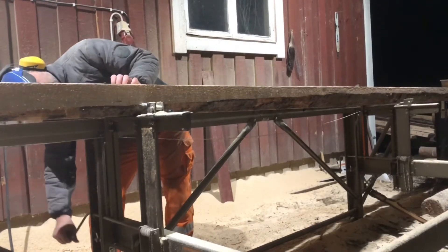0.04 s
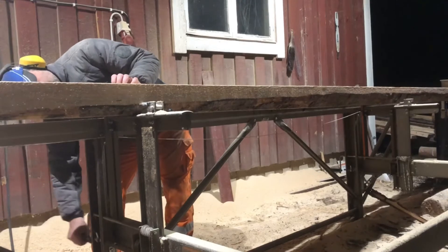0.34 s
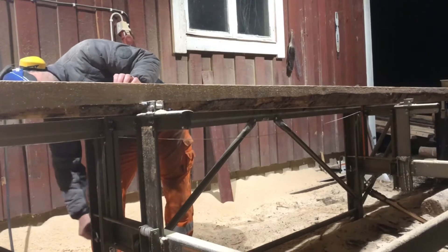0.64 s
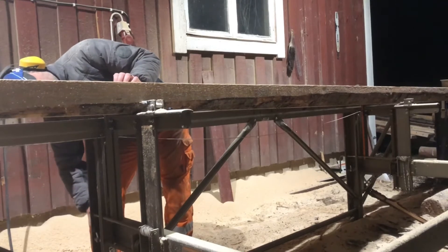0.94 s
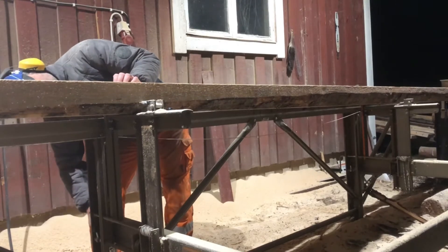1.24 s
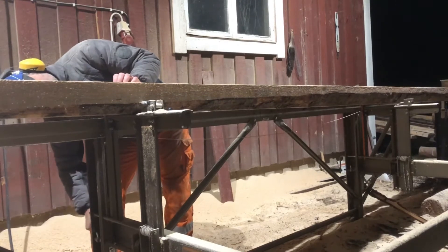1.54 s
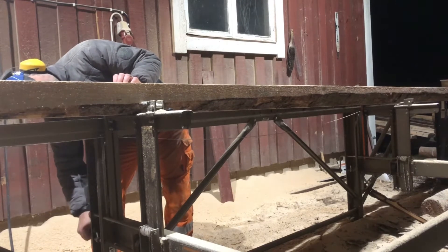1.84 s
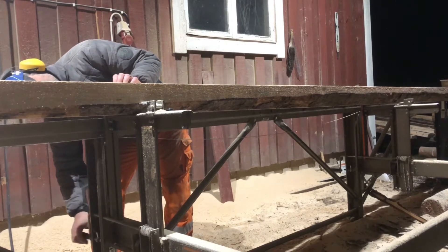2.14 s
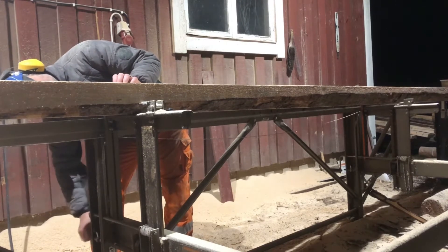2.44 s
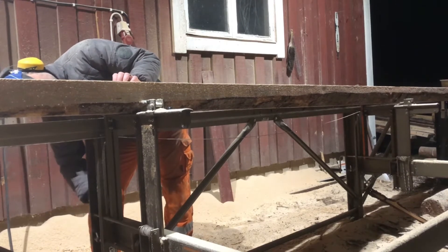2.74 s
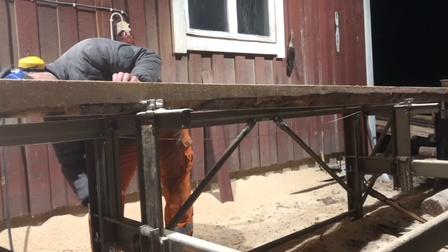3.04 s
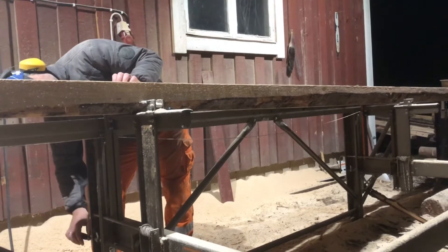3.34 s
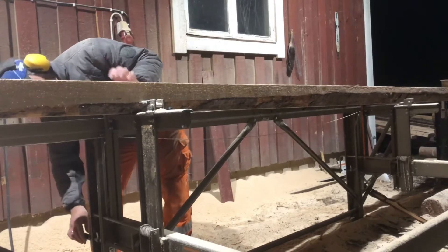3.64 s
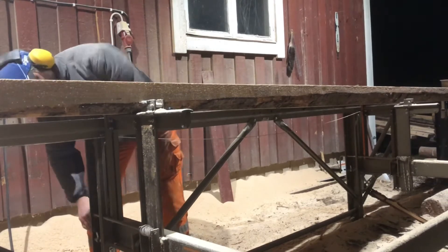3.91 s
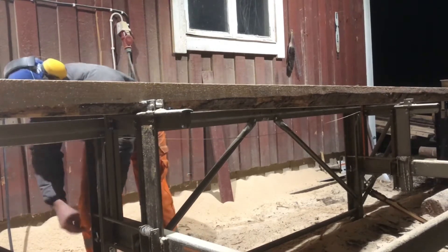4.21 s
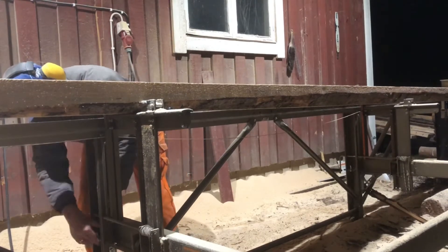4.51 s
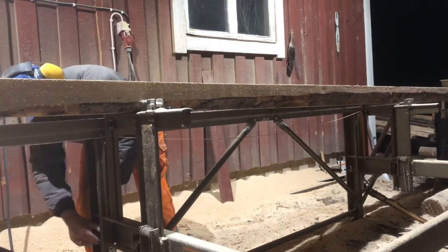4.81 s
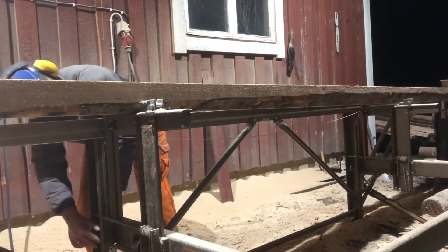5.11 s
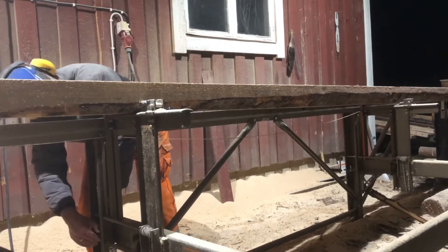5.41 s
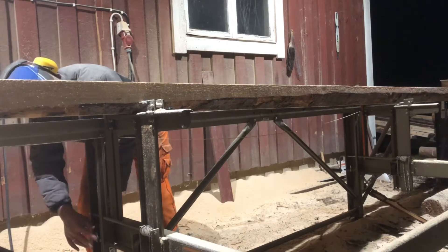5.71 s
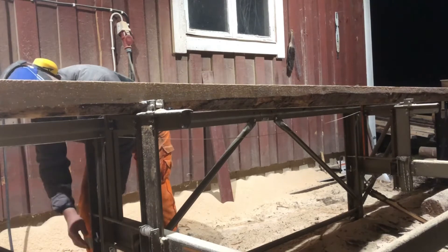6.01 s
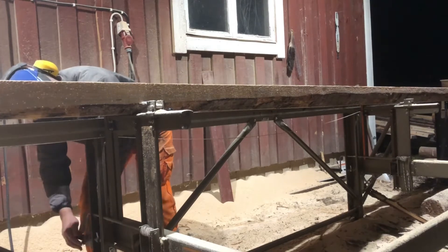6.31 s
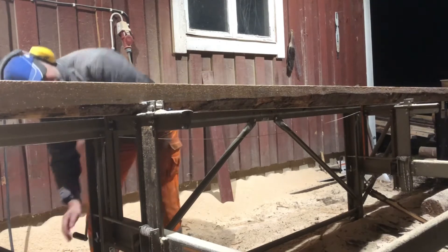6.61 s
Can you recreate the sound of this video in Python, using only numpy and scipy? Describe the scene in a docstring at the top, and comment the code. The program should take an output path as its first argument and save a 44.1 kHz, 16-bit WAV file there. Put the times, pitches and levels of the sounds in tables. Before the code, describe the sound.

Three hard steel blows clack on a log clamp right at the start, at 0.3 and at 0.7 seconds, each ringing for under half a second through the frame of a small, idle sawmill. A lull follows, with a barely audible scrape at 1.5 seconds and soft knocks and sliding from 2.3. A fourth bright blow lands at 2.7 seconds, followed near 3 by a knock and a short juddering scrape of the clamp bar. A jacket rustles faintly from about 3.4. Between 4 and 5.3 seconds loose steel parts knock and clink irregularly, much quieter than the blows. A duller fifth blow rings at 5.4 seconds. At 6 comes a brief scrape with a thin, very high squeak, then light knocks and cloth rustle until about 6.7. Shed walls add a short echo, and a faint outdoor hush lies underneath throughout.

```python
"""Hard steel blows clack on a log clamp and ring through the frame of a small, idle sawmill.
Between them, as a man sets the clamp, loose parts knock and clink, its bar scrapes in quick slips
and squeaks, and his jacket rustles as he shifts. The walls of a wooden shed answer the steel,
over a faint outdoor hush."""
import sys
import numpy as np
from scipy import signal
from scipy.fft import rfft, irfft, next_fast_len
from scipy.io import wavfile
from scipy.ndimage import uniform_filter1d, map_coordinates

SR = 44100
rng = np.random.default_rng(int(sys.argv[2]) if len(sys.argv) > 2 else 0)


def put_to_file(sound):
    """Save the sound as 16-bit audio at rate SR, in the file named by the first command-line argument."""
    columns = np.atleast_2d(sound).T  # one column per channel
    safe = np.clip(columns, -1, 1)
    whole_steps = np.round(safe * 32767)
    wavfile.write(sys.argv[1], SR, whole_steps.astype(np.int16))


N = 297675
RING_SAMPLES = SR * 3 // 4

# Blows: (time [s], gain [dB], low-pass [Hz], frame gain [dB], spot [0 head, 1 side])
BLOW_HITS = [(-0.025, 1, 7000, 1.5, 0.094), (0.3205, 2.5, 12000, -.5, 0.027), (0.724, 0.5, 9000, 1.5, 0),
             (2.6637, 1, 13830, 1.5, 0), (5.4206, -1, 2410, 0, 1)]
# Clamp modes: (frequency [Hz], level [dB], t60 [s])
CLAMP_MODES = [(637.3, -14, .03), (980, -9.5, 0.032), (1223, -8.5, 0.032), (1589, -5, .025),
               (1973, -8, 0.073), (2480, -6.5, .02), (2910, 1.5, .02), (3606, -3.5, 0.032),
               (4240, -9, 0.028), (4910, -9.5, 0.012), (5400, -5.5, .022), (8020, -15.5, 0.017),
               (10060, -12.5, 0.023), (10650, -22, .016)]
# Frame modes: (frequency [Hz], level hit on head [dB], level hit on side [dB], t60 [s])
FRAME_MODES = [(243, -11, -21, .38), (308.7, -11, -6, .28), (381.2, -16.5, -10, 0.44),
               (570.4, -10.5, -18, 0.4), (658.3, -8, -12, 0.51), (688.6, -0.5, -13.5, 0.33),
               (713.5, -2.5, -11, 0.38), (758, -5.5, -12.5, 0.28), (860, -11.5, -3, 0.17),
               (1038, -9.5, -3.5, 0.29), (1068, -11.5, -7.5, 0.42), (1179, -7, -7, 0.22),
               (1348, -9, -13.5, 0.37), (1544, -5.5, -5.5, 0.25), (1714, 2, -1, .22),
               (1773, -6.5, 3.5, .22), (1850, -4, -6, 0.11), (1935, -4, -5.5, 0.3), (2140, -11.5, 0, .24),
               (2330, -5, -6.5, 0.12), (2470, -2.5, -9.5, .24), (2602, -2.5, -1, 0.27),
               (2845, -5.5, -6.5, 0.27), (3030, -14.5, -2.5, 0.26), (3115, -6.5, -5.5, 0.17),
               (3373, -7, -15.5, 0.24), (3610, -6.5, -12, 0.16), (3770, -8.5, -7, 0.2),
               (4050, -9.5, -16, 0.18), (5410, -12, -10.5, 0.18)]
# Bare steel contact: (frequency [Hz], relative density [dB])
CRACK_SPECTRUM = [(40, -58.5), (300, -26), (1000, -6), (3000, 0), (5400, -1.5), (6500, -10.5), (11000, -12),
                  (13000, -21.5)]
# Diffuse frame clang: (frequency [Hz], relative density [dB])
CLANG_SPECTRUM = [(30, -50), (65, -19.5), (190, -18.5), (255, -15), (480, -10), (720, -2.5), (950, -9),
                  (1600, -4.5), (2650, -3.5), (3400, -8.5), (5400, -13.5), (7000, -17), (10200, -23.5),
                  (12000, -33.5), (16000, -35)]


def blows(clack_db=-7, crack_db=-15, crack_t60_s=0.048, ring_db=-25, clang_db=-19,
          attack_s=0.00022, build_s=0.0023, clack_highpass_hz=400, fresh_gain=0.23, scatter_db=1):
    """Steel on steel: the clamp clacks, the frame rings. Same parts, so the blows sound much alike."""
    out, t = np.zeros(N), np.arange(RING_SAMPLES) / SR
    clamp_hz, clamp_db, clamp_t60 = np.transpose(CLAMP_MODES)
    frame_hz, head_db, side_db, frame_t60 = np.transpose(FRAME_MODES)
    clamp = damped_modes(clamp_hz, clamp_t60)
    frame = damped_modes(frame_hz, frame_t60)
    head_clang = modal_noise(CLANG_SPECTRUM)
    highpass = signal.butter(2, clack_highpass_hz, "high", fs=SR)  # the clack carries little bass

    def struck(modes, db):
        return amp(db + scatter_db * rng.standard_normal(len(modes))) @ modes

    for start, db, lowpass_hz, frame_db, spot in BLOW_HITS:
        clack = amp(clack_db) * struck(clamp, clamp_db)
        clack += amp(crack_db) * modal_noise(CRACK_SPECTRUM) * 1000 ** (-t / crack_t60_s)
        clack = signal.lfilter(*highpass, clack * (1 - np.exp(-t / attack_s)))
        tones = struck(frame, head_db + spot * (side_db - head_db))
        diffuse = unit_rms((1 - spot) * head_clang + fresh_gain * modal_noise(CLANG_SPECTRUM))
        clang = amp(frame_db) * (amp(clang_db) * yard_decay(diffuse) + amp(ring_db) * tones)
        blow = clack + frame_spread(clang, build_s)
        lowpass = signal.butter(1, lowpass_hz, fs=SR)  # a softer contact lasts longer, loses treble
        add(out, start, amp(db) * signal.lfilter(*lowpass, blow))
    return out


# Clamp on frame: (time [s], body level [dB], low-pass [Hz], ring pitch [Hz], ring level [dB])
KNOCK_HITS = [(2.256, -52.5, 1310, 430, -59.5), (2.294, -56, 3000, 347, -53.5),
              (2.409, -56, 2500, 298, -56), (2.439, -55, 1200, 280, -52), (2.945, -37, 4960, 905, -42),
              (2.992, -44.5, 3000, 784, -48), (4.013, -43.5, 2200, 1060, -44.5),
              (4.078, -44, 2470, 1006, -45.5), (4.218, -53.5, 1790, 382, -47.5),
              (4.257, -50.5, 2800, 350, -52.5), (4.450, -34.5, 3550, 1030, -37.5),
              (4.471, -33.5, 1510, 295, -45), (4.528, -43.5, 1300, 219.4, -55),
              (4.702, -37, 1400, 372, -44), (5.037, -56.5, 1500, 800, -61),
              (5.252, -38.5, 2000, 577, -39.5), (5.263, -40.5, 900, 233, -35),
              (5.688, -55.5, 1792, 970, -55.5), (5.879, -50.5, 3000, 756, -54),
              (6.107, -49.5, 2600, 940, -52.5), (6.655, -57, 1300, 800, -62.5),
              (6.732, -63, 2500, 344, -47)]
# Knock body: (frequency [Hz], relative density [dB])
KNOCK_SPECTRUM = [(35, -41.5), (110, -15.5), (250, -6.5), (450, -6.5), (650, -2), (950, -2), (1350, -9),
                  (3300, -15), (6000, -26.5), (11000, -40), (16000, -48)]


def knocks(ring_width_ratio=0.22):
    """Loose parts meet the frame: softer contacts are duller, each spot has its own blurred pitch."""
    out = np.zeros(N)
    for start, db, lowpass_hz, ring_hz, ring_db in KNOCK_HITS:
        thud = filtered(modal_noise(KNOCK_SPECTRUM), lambda hz: (1 + (hz / lowpass_hz) ** 4) ** -0.5)
        body = amp(db) * unit_rms(thud) + amp(ring_db) * resonant_noise(ring_hz, ring_width_ratio)
        add(out, start, tap(body, contact_db=1.5, contact_t60_s=0.017, attack_s=0.00073))
    return out


# Small parts: (time [s], ring level [dB], ring pitch [Hz], ring width [ratio], tick level [dB])
CLINK_HITS = [(2.293, -64.5, 2800, .2, -76), (4.013, -42, 4680, 0.16, -45), (4.257, -51, 4700, .2, -55.5),
              (4.691, -53, 7700, 0.067, -46), (5.251, -43.5, 2850, 0.078, -55)]
# Clink contact: (frequency [Hz], relative density [dB])
TICK_SPECTRUM = [(100, -33), (1000, 0), (3300, 0), (6000, -1.5), (9000, -3), (11000, -16), (16000, -20)]


def clinks(play_lead_s=0.02, play_db=-51, play_hz=3021, play_width_ratio=0.32):
    """Small steel parts touch: a bright tick and one blurred ring."""
    out, bodies = np.zeros(N), []
    for start, ring_db, hz, width_ratio, tick_db in CLINK_HITS:
        ring = amp(ring_db) * resonant_noise(hz, width_ratio)
        bodies.append((start, ring + amp(tick_db) * modal_noise(TICK_SPECTRUM)))
    # the loose clamp takes up its play just before each blow on its head
    for start, *_, spot in BLOW_HITS:
        tick = (1 - spot) * amp(play_db) * resonant_noise(play_hz, play_width_ratio)
        bodies.append((start - play_lead_s, tick))
    for start, body in bodies:
        add(out, start, tap(body, contact_db=2, contact_t60_s=0.025, attack_s=0.001))
    return out


# Bar slides: (time [s], length [s], judder level [dB], relative rasp level [dB])
BAR_SLIDES = [(1.549, 0.11, -68.5, -74), (2.443, 0.24, -64, -61), (2.967, 0.15, -44, -49.5),
              (5.984, .14, -52.5, -59.5)]
# Bar resonances: (frequency [Hz], width [Hz], level [dB])
BAR_MODES = [(345, 81, -1.5), (540, 200, -4.5), (696, 177, -2), (898, 74, -0.5), (1355, 260, -10.5),
             (1704, 270, -13)]
# Bar rasp: (frequency [Hz], relative density [dB])
RASP_SPECTRUM = [(1000, -29), (1900, -1.5), (2800, -1.5), (3100, -5), (4000, -1.5), (4650, -12.5),
                 (5050, -6.5), (5450, -20.5), (5850, -3.5), (6200, -14), (8000, -23.5), (12000, -34.5),
                 (16000, -48.5)]


def scrapes(slip_hz=85, jitter=0.15, scatter_db=2.5, direct_gain=14, rasp_db=-1, rasp_fade_db_per_s=56):
    """The clamp bar slides in quick, uneven slips that shake its resonances; the rasp fades as it moves."""
    def bar_response(hz):
        return sum((-1) ** k * amp(db) * 1j * hz * width / (centre ** 2 - hz ** 2 + 1j * hz * width)
                   for k, (centre, width, db) in enumerate(BAR_MODES))

    slip_count = np.floor(np.cumsum(slip_hz * np.exp(jitter * wobble(120))) / SR)
    slips = np.diff(slip_count, prepend=0) * amp(scatter_db * rng.standard_normal(N))
    yard_impulse = yard_decay(rng.standard_normal(RING_SAMPLES))
    drive = direct_gain * slips + signal.fftconvolve(slips, yard_impulse)[:N]
    judder_env, rasp_env, t = np.zeros(N), np.zeros(N), np.arange(N) / SR
    for start, length, judder_db, slide_rasp_db in BAR_SLIDES:
        speed = stroke(start, length, attack_s=0.079, t60_s=0.35)
        judder_env += speed * amp(judder_db)
        rasp_env += speed * amp(rasp_db + slide_rasp_db - rasp_fade_db_per_s * np.maximum(t - start, 0))
    judder = unit_rms(filtered(drive, bar_response))
    rasp = unit_rms(coloured(drive, RASP_SPECTRUM))
    return judder_env * judder + rasp_env * rasp


# Clamp squeaks: (time [s], pitch [Hz], level [dB], length [s])
CLAMP_SQUEAKS = [(2.295, 7000, -67, 0.03), (5.997, 6960, -38.5, 0.031)]
# Wall echoes: (delay [s], gain [dB])
WALL_ECHOES = [(0.035, -8), (0.061, -16), (.093, -25), (.124, -31.5)]


def squeaks(octave_db=-30, tail_db=-20, tail_width_ratio=0.012):
    """Thin, very high squeaks that flutter between the walls."""
    out, t = np.zeros(N), np.arange(RING_SAMPLES) / SR
    for start, hz, db, length in CLAMP_SQUEAKS:
        phase = 2 * np.pi * hz * t
        progress = np.minimum(t / length, 1)
        peep = np.sin(np.pi * progress) * (np.sin(phase) + amp(octave_db) * np.sin(2 * phase))
        for delay, echo_db in [(0, 0), *WALL_ECHOES]:
            add(out, start + delay, amp(db + echo_db) * peep)
        tail = yard_decay(resonant_noise(hz, tail_width_ratio)) * progress
        add(out, start, amp(db + tail_db) * tail)
    return out


# Moves of arm or back: (time [s], length [s], level [dB])
JACKET_RUBS = [(3.359, 0.2, -63), (3.575, 0.11, -61), (3.708, 0.22, -53), (4.19, 0.14, -61),
               (4.43, 0.15, -63.5), (4.816, .19, -65.5), (5.164, 0.05, -50.5), (6.305, 0.14, -57.5),
               (6.419, 0.11, -50), (6.576, 0.13, -64.5)]
# Cloth friction: (frequency [Hz], relative density [dB])
CLOTH_SPECTRUM = [(120, -46), (200, -18), (245, -4.5), (416, -4), (696, -2.5), (806, 0), (2020, -7),
                  (2210, -4.5), (2650, -6), (5520, -8), (16000, -21)]


def jacket(grain_db=1.0, grain_hz=270):
    """Cloth rubs on cloth in strokes of fine, uneven hiss."""
    rubs = [amp(db) * stroke(start, length, attack_s=0.088, t60_s=0.42)
            for start, length, db in JACKET_RUBS]
    envelope = np.linalg.norm(rubs, axis=0)  # overlaps add in power
    hiss = coloured(rng.standard_normal(N), CLOTH_SPECTRUM)
    return envelope * unit_rms(hiss * amp(grain_db * wobble(grain_hz)))


# Outdoor air: (frequency [Hz], relative density [dB])
HUSH_SPECTRUM = [(20, -17.5), (35, -4.5), (55, 0), (80, -1), (130, -5.5), (300, -9.5), (520, -13),
                 (700, -12), (1100, -13), (1450, -17.5), (1700, -14.5), (2050, -22.5), (3500, -27.5),
                 (8000, -27), (11500, -31.5), (14500, -27), (16000, -30)]


def hush(level_db=-64.5, drift_db=1.8, drift_hz=3.2):
    """Still outdoor air; the level drifts slightly."""
    gain = amp(level_db - drift_db * wobble(drift_hz))
    return gain * unit_rms(coloured(rng.standard_normal(N), HUSH_SPECTRUM))


# Yard reverberation: (frequency [Hz], t60 [s])
YARD_T60 = [(80, 0.83), (210, 0.58), (560, 0.37), (1470, 0.33), (3880, 0.28), (10200, .2), (15000, 0.27)]


def yard_decay(x):
    """Each frequency of x dies away at the yard's rate."""
    hz, t, bins = signal.stft(x, SR, nperseg=256)
    decay = 1000 ** (-t / log_interp(YARD_T60, hz)[:, None])
    return signal.istft(bins * decay, SR, nperseg=256)[1][:len(x)]


def tap(body, contact_db, contact_t60_s, attack_s, tail_db=-3):
    """A short contact, then the answer of frame and walls."""
    t = np.arange(RING_SAMPLES) / SR
    contact = amp(contact_db) * body * 1000 ** (-t / contact_t60_s)
    return frame_spread(contact + amp(tail_db) * yard_decay(body), attack_s)


def frame_spread(x, treble_rise_s, bass_rise_s=0.012, crossover_hz=400):
    """Slow bending waves cross the frame later, so the bass swells after the treble."""
    t = np.arange(RING_SAMPLES) / SR
    bass = filtered(x, lambda hz: 1 / (1 + (hz / crossover_hz) ** 6))
    treble = x - bass
    return treble * (1 - np.exp(-t / treble_rise_s)) + bass * (1 - np.exp(-(t / bass_rise_s) ** 2))


def damped_modes(hz, t60_s, blur_hz=5):
    """Unit-amplitude modes, one per row; phases wander as wall echoes mix in."""
    t = np.arange(RING_SAMPLES) / SR
    walk = np.cumsum(rng.standard_normal((len(hz), RING_SAMPLES)), axis=1)
    wander = uniform_filter1d(walk * np.sqrt(2 * np.pi * blur_hz / SR), size=300, axis=1)
    phase = 2 * np.pi * (hz[:, None] * t + rng.random((len(hz), 1)))
    return 1000 ** (-t / t60_s[:, None]) * np.sin(phase + wander)


def modal_noise(spectrum, spacing_hz=110, ripple_db=3):
    """Coloured noise, rms 1, with the random peaks and gaps of crowded modes."""
    knots = rng.standard_normal(SR // spacing_hz)

    def response(hz):
        ripple = hz / (hz + 1000) * map_coordinates(knots, [hz / spacing_hz])
        return amp(log_interp(spectrum, hz) + ripple_db * ripple)

    return unit_rms(filtered(rng.standard_normal(RING_SAMPLES), response))


def resonant_noise(centre_hz, width_ratio):
    """Noise in one blurred resonance, rms 1; width is relative to the centre."""
    white = rng.standard_normal(RING_SAMPLES)
    return unit_rms(filtered(white, lambda hz: 1 / (1 + ((hz / centre_hz - 1) / width_ratio) ** 2)))


def stroke(start_s, length_s, attack_s, t60_s):
    """Envelope of a sliding move: gathers speed, holds, dies away."""
    t = np.arange(N) / SR - start_s
    rise = np.sin(np.pi / 2 * np.clip(t / attack_s, 0, 1)) ** 2
    return rise * 1000 ** (-np.maximum(t - length_s, 0) / t60_s)


def wobble(rate_hz):
    """Smooth random curve, rate_hz knots per second."""
    knots = rng.standard_normal(int(N * rate_hz / SR) + 4)
    return map_coordinates(knots, [np.arange(N) * rate_hz / SR])


def filtered(x, response):
    """Apply a frequency response to x."""
    size = next_fast_len(len(x) + 4096, real=True)
    return irfft(rfft(x, size) * response(np.fft.rfftfreq(size, 1 / SR)), size)[:len(x)]


def coloured(x, spectrum):
    """Shape x by (frequency [Hz], gain [dB]) points."""
    return filtered(x, lambda hz: amp(log_interp(spectrum, hz)))


def log_interp(points, hz):
    """Read (frequency [Hz], value) points on a log axis."""
    point_hz, values = np.transpose(points)
    return np.interp(np.log(hz + 1), np.log(point_hz + 1), values)


def amp(db):
    return 10 ** (np.asarray(db) / 20)


def unit_rms(x):
    return x / np.sqrt(np.mean(x ** 2) + 1e-20)


def add(track, start_s, sound):
    """Mix a sound in, cropped to the track."""
    start = round(start_s * SR)
    part = sound[max(-start, 0):len(track) - start]
    track[max(start, 0):][:len(part)] += part


def scene():
    """All sources, mono."""
    return (blows() + knocks() + clinks() + scrapes() + squeaks() + jacket() + hush())[None]


def record(dry, highpass_hz=50, ceiling=0.95, lowpass_hz=16100):
    """Microphone: thins deep bass, rounds peaks, limits bandwidth."""
    thinned = signal.lfilter(*signal.butter(3, highpass_hz, "high", fs=SR), dry[0])
    rounded = thinned / (1 + np.abs(thinned / ceiling) ** 6) ** (1 / 6)
    return filtered(rounded, lambda hz: 1 / (1 + (hz / lowpass_hz) ** 120))[None]


dry = scene()
out = record(dry)
put_to_file(out)
```